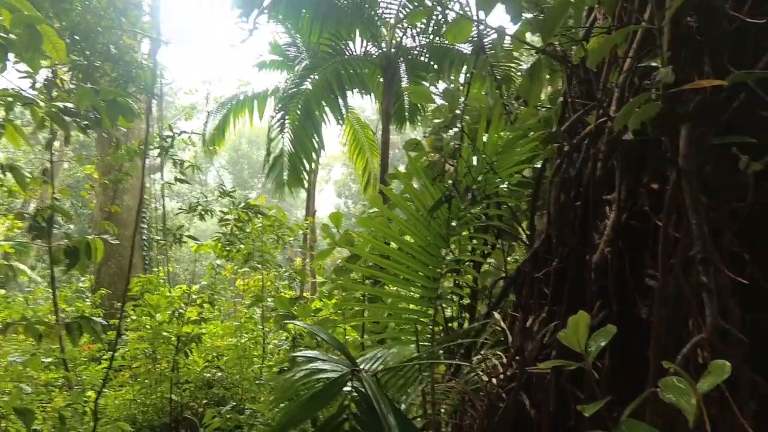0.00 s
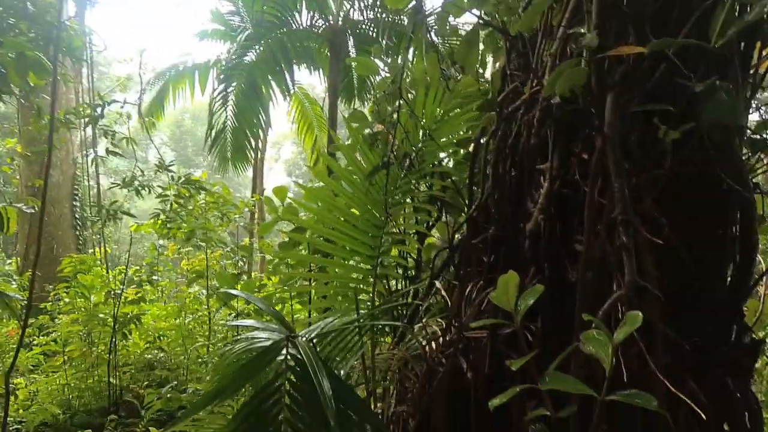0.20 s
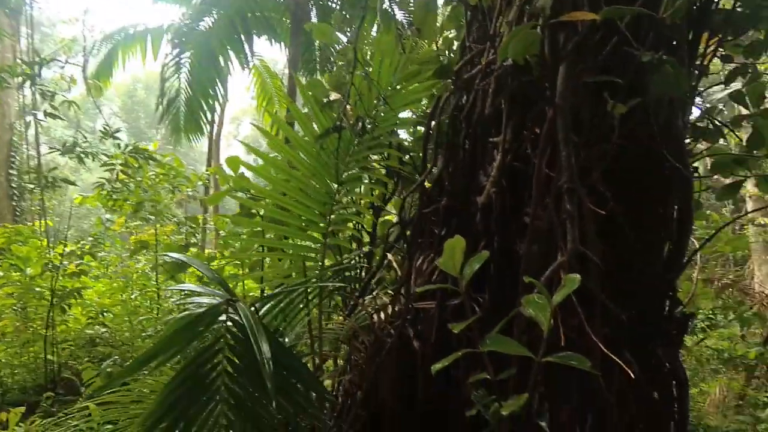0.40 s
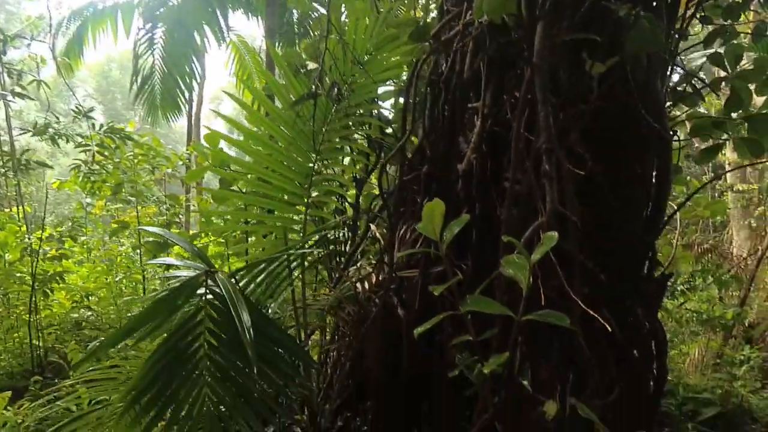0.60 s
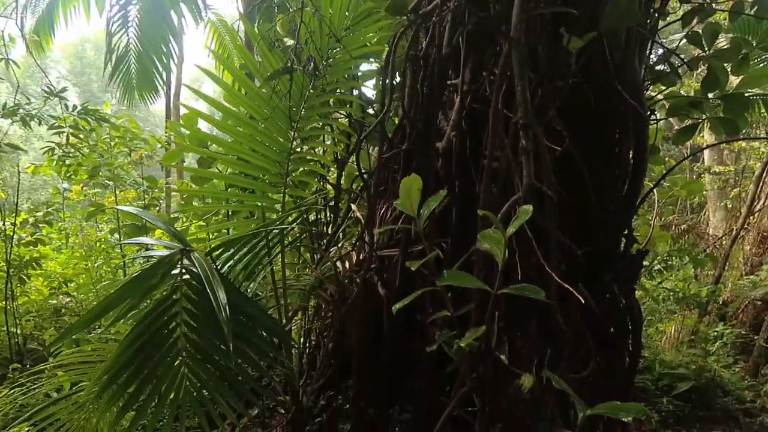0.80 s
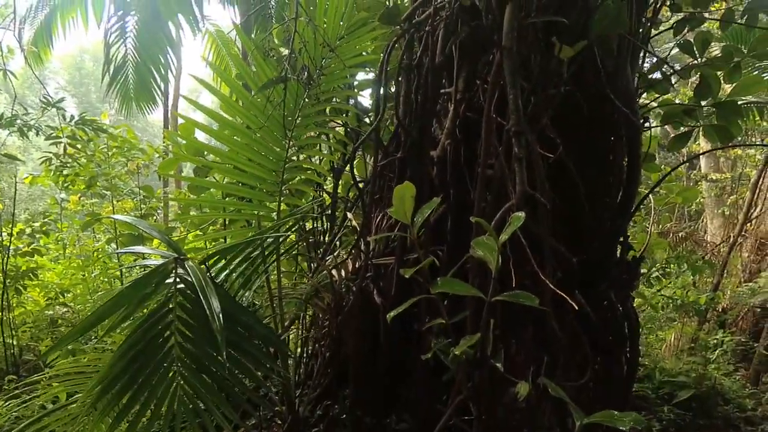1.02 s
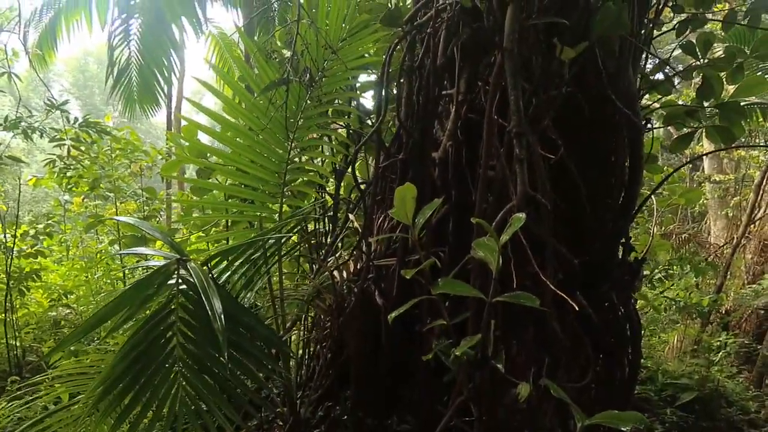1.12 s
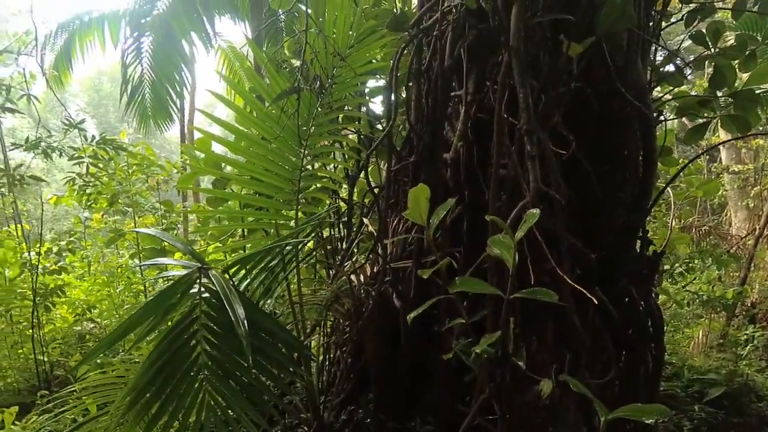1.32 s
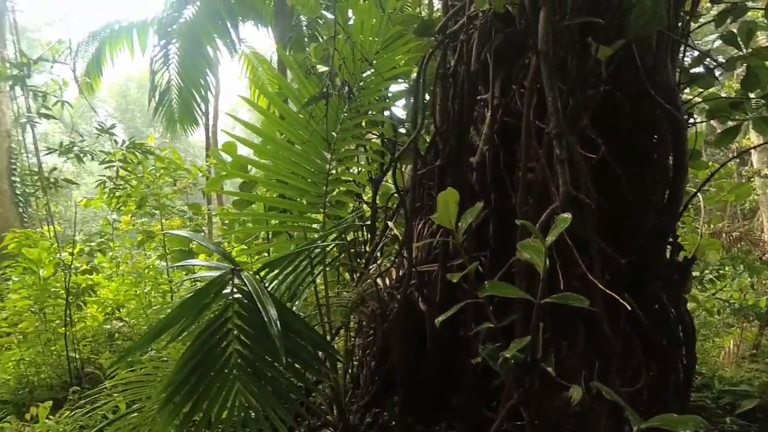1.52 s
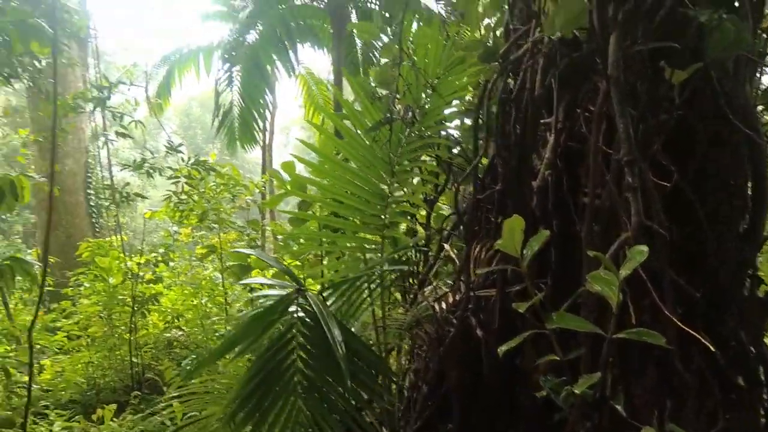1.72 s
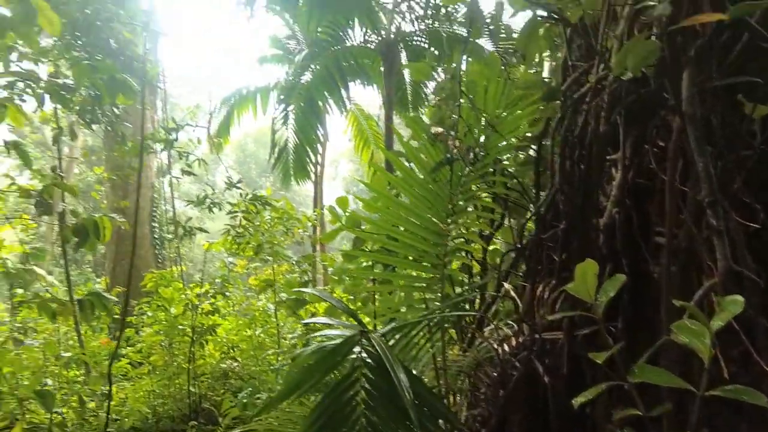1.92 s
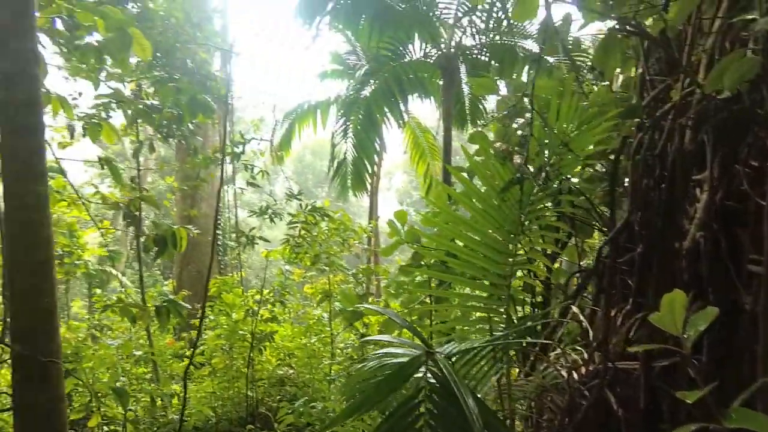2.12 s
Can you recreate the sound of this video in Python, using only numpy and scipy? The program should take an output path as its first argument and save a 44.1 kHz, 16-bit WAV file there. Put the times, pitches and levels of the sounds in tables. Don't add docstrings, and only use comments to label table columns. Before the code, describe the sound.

Very close handling of a camera's plastic case: brief palm scuff, one violent dry click, gritty finger rub, soft low bumps, then a faint click, while distant rainforest frogs and insects blur into quiet hiss.

```python
import sys
import numpy as np
from scipy import signal
from scipy.fft import rfft, irfft, next_fast_len
from scipy.io import wavfile
from scipy.ndimage import map_coordinates

SR = 44100
rng = np.random.default_rng(int(sys.argv[2]) if len(sys.argv) > 2 else 0)


def nominal_scale(level):
    x = np.asarray(level, float) / 20
    return 10 ** x


def file_out(sig):
    cols = np.atleast_2d(sig).T
    lim = np.clip(cols, -1, 1)
    pcm = np.round(lim * 32767).astype(np.int16)
    wavfile.write(sys.argv[1], SR, pcm)


N = 97020

SNAP_S = .2411
TOP_HZ = 15320


def unit(x):
    return x / np.sqrt(np.mean(x ** 2) + 1e-20)


def along(points, hz):
    f, v = np.transpose(points)
    return np.interp(np.log(hz + 1), np.log(f + 1), v)


def curve(rows, outside=-120, axis=1):
    table = np.transpose(rows)
    return np.interp(np.arange(N) / SR, table[0], table[axis], left=outside, right=outside)


def wobble(rate):
    knots = rng.standard_normal(int(N * rate / SR) + 4)
    return map_coordinates(knots, [np.arange(N) * rate / SR])


def filtered(x, response):
    m = next_fast_len(N + SR // 4)
    return irfft(rfft(x, m) * response(np.fft.rfftfreq(m, 1 / SR)), m)[..., :N]


def stereo(mid, side):
    return np.array([mid + side, mid - side])


def add(track, s, sound):
    k = round(s * SR)
    track[..., k:k + sound.shape[-1]] += sound[..., :N - k]


def snap(modes, crack_db, crack_s, rebound_s, rebound_db):
    t = np.arange(SR // 10) / SR

    def ring(column, lead):
        total = 0
        for k, mode in enumerate(modes):
            decay = nominal_scale(mode[column] - 60 * t / mode[3])
            total = total + (-1) ** k * decay * np.sin(2 * np.pi * mode[0] * t + lead + 0.21 * k)
        return total

    burst = rng.standard_normal((2, len(t))) * nominal_scale(crack_db - 60 * t / crack_s)
    crack = filtered(burst, lambda f: 1j * f / 8000 / (1 + (f / 14500) ** 12))[:, :len(t)]
    onset = 1 - np.exp(-t / 0.00016)
    blow = (stereo(ring(1, 0), ring(2, 1.56)) + crack) * onset
    return blow + nominal_scale(rebound_db) * np.roll(blow, round(rebound_s * SR), axis=1)


# (frequency [Hz], centre level [dB], flank level [dB], 60 dB decay time [s])
HARD_SNAP_MODES = [(130, -25, -39, 0.026), (206.4, -20.5, -6.5, 0.029), (279, -16, -32, 0.02),
                   (488, -8, -26, 0.011), (817.5, -9, -50, 0.022), (1086, -1, -12.5, 0.016),
                   (1358, -2.5, -29, 0.0086), (1754, -0.5, -10.5, 0.016), (2310, -7, -10, 0.015),
                   (2730, 4, 1, 0.011), (3423, 6, 6.5, 0.0083), (4600, 3, -28, 0.0028)]
SMALL_SNAP_MODES = [(590, -15, -32, 0.018), (766, -14.5, -26, 0.027), (1230, -5, -15, 0.012),
                    (1760, -8.5, -17, 0.029), (2350, -1, -20, 0.013), (2740, -4, -13, 0.01),
                    (3480, -2, 2, 0.02), (4460, -17, -12, 0.0047), (4800, -10, -4, 0.0075),
                    (5500, -16, -15, .006), (6440, -7, -10, 0.0067), (9470, -19, -22, 0.0051),
                    (14800, -11, -13, 0.0044)]


def snaps():
    out = np.zeros((2, N))
    hard = snap(HARD_SNAP_MODES, crack_db=-7.0, crack_s=0.0033, rebound_s=.0016, rebound_db=-14)
    small = snap(SMALL_SNAP_MODES, crack_db=-1, crack_s=0.004, rebound_s=.001, rebound_db=-4)
    add(out, SNAP_S, nominal_scale(19) * hard)
    add(out, 1.1638, nominal_scale(-22.5) * small)
    return out


# (time [s], level [dB])
TWIG_TICKS = [
    (.0328, -46),
    (.7607, -45),
]


def twigs():
    out = np.zeros((2, N))
    t = np.arange(400) / SR
    for s, db in TWIG_TICKS:
        burst = rng.standard_normal((2, 400)) * nominal_scale(db - 60 * t / .004)
        add(out, s, filtered(burst, lambda f: f / 8000 / (1 + (f / 14500) ** 30))[:, :400])
    return out


def case_response(modes):
    def response(f):
        total = 0
        for k, (centre, width, db) in enumerate(modes):
            resonance = 1j * f * width / (centre * centre - f * f + 1j * f * width)
            total = total + (-1) ** k * nominal_scale(db) * resonance
        return total / (1 + 1j * f / 4180) ** 3
    return response


def slip_force(rows, body):
    slips = rng.standard_normal((2, N)) * (rng.random(N) < .4) * nominal_scale(0.9 * wobble(149.6))
    slips *= nominal_scale(curve(rows)) / filtered(slips[0], case_response(body)).std()
    slips[1] *= nominal_scale(-10.5)
    return slips


# (frequency [Hz], width [Hz], level [dB])
PALM_CASE = [(230, 170, -6.5), (426, 53, 3), (830, 230, 2.5), (990, 87, -3), (1360, 640, -12),
             (2250, 760, -8), (3400, 500, -27)]
FREE_CASE = [(320, 150, -14.5), (437, 124, -8.5), (849, 142, 7.5), (1028, 104, 2.5), (1500, 180, -25),
             (1675, 130, -9.5), (2500, 190, -4), (2630, 120, -6), (3530, 320, -9)]
# (time [s], pressure level [dB], brightness [dB])
PALM_SHIFT = [
    (0, -46, 2),
    (.012, -40, 1),
    (.03, -71, -5.5),
    (.066, -60, -6),
    (.075, -50, -7),
    (.124, -49.5, 2.5),
    (.165, -64, -6),
    (.19, -42, 6),
    (.232, -43.5, 3),
]
FINGER_RUB = [
    (.327, -55, -13),
    (.336, -45.5, -11),
    (.37, -38.5, -5.5),
    (.41, -29.5, 4),
    (.432, -32.5, 3),
    (.49, -42.5, 6),
    (.499, -35, 9),
    (.522, -57, 13),
    (.56, -48, 10.5),
]
# (time [s], level [dB])
SKIN_CATCHES = [(.0045, -33), (.0093, -42), (.075, -36), (.0845, -40), (.1935, -42), (.21, -36),
                (.342, -33), (.3775, -25.5), (.3855, -23), (.391, -22.5), (.4075, -26), (.4145, -14),
                (.4175, -20), (.4228, -16), (.4455, -33), (.497, -36), (.4992, -30.5), (1.975, -37.5)]


def rub():
    turn_hz = 950
    skin_hz, skin_width = 13200, 3600
    catch_pulse = np.hanning(25)[None] * [[.11], [.025]]

    def skin(f):
        return nominal_scale(-35) / (1 + ((f - skin_hz) / (skin_width / 2)) ** 2) * (f < TOP_HZ)

    out = np.zeros((2, N))
    for rows, body, before_snap in ((PALM_SHIFT, PALM_CASE, True), (FINGER_RUB, FREE_CASE, False)):
        slips = slip_force(rows, body)
        for s, db in SKIN_CATCHES:
            if (s < SNAP_S) == before_snap:
                add(slips, s, nominal_scale(db + 25) * catch_pulse)
        tip = nominal_scale(curve(rows, outside=0, axis=2))
        out += filtered(slips[0] * tip ** 2 * rng.standard_normal((2, N)), skin)
        low_modes = [mode for mode in body if mode[0] < turn_hz]
        high_modes = [mode for mode in body if mode[0] >= turn_hz]
        low = filtered(slips / tip, case_response(low_modes))
        high = filtered(slips * tip, case_response(high_modes))
        out += stereo(*(low + high))
    return out


# (time [s], level [dB], frequency [Hz], signed strength [ratio])
HAND_BUMPS = [(0.095, -28, 170, 0.5), (.121, -32.5, 179, 0.55), (.160, -35.5, 169, 1),
              (.197, -29, 200, 0.85), (0.304, -44, 70, 0.92), (0.316, -38, 200, -1.2),
              (0.421, -39.5, 130, 0.61), (.545, -39.5, 194, -0.87), (.576, -32, 183, 0.97),
              (.771, -36.5, 170, -1.1), (1.655, -37, 198, -0.82), (1.682, -46.5, 172, -1.2),
              (1.717, -37.5, 198, -0.91), (1.757, -43, 170, -1.3), (1.78, -38.5, 157, -1.1),
              (1.849, -40, 234, -1.03), (1.928, -40, 200, 0.77), (2.165, -44, 120, 1),
              (2.187, -38, 143, -0.97), (2.194, -40, 142, -1.2)]


def bumps():
    out = np.zeros((2, N))
    t = np.arange(-600, 600) / SR
    faint = [(0.02033 + 2.1 * a, -55 + 8 * b, 110 + 160 * c, np.sign(d - .5))
             for a, b, c, d in rng.random((50, 4))]
    for s, db, hz, way in HAND_BUMPS + faint:
        packet = np.exp(-(2.22 * hz * t) ** 2) * np.cos(2 * np.pi * hz * t + 0.1)
        add(out, s - 600 / SR, way * nominal_scale(db) * packet * nominal_scale([[1.5], [-1.5]]))
    return out


def cricket():
    chirp_rate, chirp_s = 23.97, 0.0021
    t = np.arange(N) / SR + .0075
    beat = np.round(t * chirp_rate)
    size, bend = rng.standard_normal((int(beat.max()) + 1, 2))[beat.astype(int)].T
    away = t - beat / chirp_rate
    level = -53 - 1.4 * t + .6 * size
    shape = nominal_scale(level) * np.exp(-.5 * (away / chirp_s) ** 2)
    phase = 2 * np.pi * (11300 + 60 * bend) * away
    return shape * np.array([np.sin(phase), 0.72 * np.sin(phase + 1.6)])


def swarm(hz, width):
    drift = nominal_scale(.4 * wobble(9) + .6 * wobble(35))
    clicks = rng.standard_normal(N) * (rng.random(N) < .4) * drift
    return unit(filtered(clicks, lambda f: 1 / (1 + ((f - hz) / (width / 2)) ** 4)))


# (frequency [Hz], width [Hz], level [dB])
CALLERS_AHEAD = [(229, 116, -62.5), (860, 500, -61), (1070, 193, -55), (1570, 350, -66), (2104, 124, -61),
                 (2270, 400, -59), (2956, 300, -61.5), (3436, 380, -58), (3640, 350, -66.5),
                 (5300, 190, -72.5)]
# (frequency [Hz], width [Hz], level per Hz [dB])
CALLERS_FLANK = [(230, 180, -70), (1060, 200, -77), (2090, 170, -74), (3320, 260, -69.5), (3750, 420, -71),
                 (4150, 400, -78), (4900, 600, -80), (5600, 330, -77)]
# (time [s], level [dB])
CHORUS_SWELL = [
    (0.0, 0.5),
    (2.2, 1),
]


def chorus():
    mid = sum(nominal_scale(db) * swarm(hz, width) for hz, width, db in CALLERS_AHEAD)
    side = sum(nominal_scale(db - 13.5) * np.sqrt(width) * swarm(hz, width) for hz, width, db in CALLERS_FLANK)
    return stereo(mid, side) * nominal_scale(curve(CHORUS_SWELL, outside=0))


# (frequency [Hz], level [dB])
AIR_CENTRE = [(15, -57), (25, -14), (214, -2.5), (519, -7), (1070, -8), (1260, -9.5), (3400, -10),
              (6140, -19), (15300, -21)]
AIR_FLANK = [(15, -53), (25, -29), (258, -8.5), (1330, -13), (2900, -12), (4500, -12.5), (6500, -18.5),
             (15300, -23)]


def air():
    noise = rng.standard_normal((2, N))
    mid, side = filtered(noise, lambda f: nominal_scale([along(AIR_CENTRE, f), along(AIR_FLANK, f)]))
    return stereo(nominal_scale(-51.5) * unit(mid), nominal_scale(-53.5) * unit(side)) * nominal_scale(0.39 * wobble(6.2))


def scene():
    far = filtered(cricket() + chorus() + air(), lambda f: f < TOP_HZ)
    duck_s, duck_db = .016, -30
    duck = [(SNAP_S, 0), (SNAP_S + .002, duck_db), (SNAP_S + duck_s, duck_db), (SNAP_S + duck_s + .002, 0)]
    return snaps() + twigs() + rub() + bumps() + far * nominal_scale(curve(duck, outside=0))


def low_pass(x):
    return signal.sosfilt(signal.butter(12, 16560, fs=SR, output="sos"), x)


def record(dry):
    clipped = dry / (1 + np.abs(dry / 0.91) ** 8) ** (1 / 8)
    mix = filtered(clipped, lambda f: 1 / (1 + (f / 15300) ** 24) ** .5)
    return low_pass(mix)


dry = scene()
out = record(dry)
file_out(out)
```